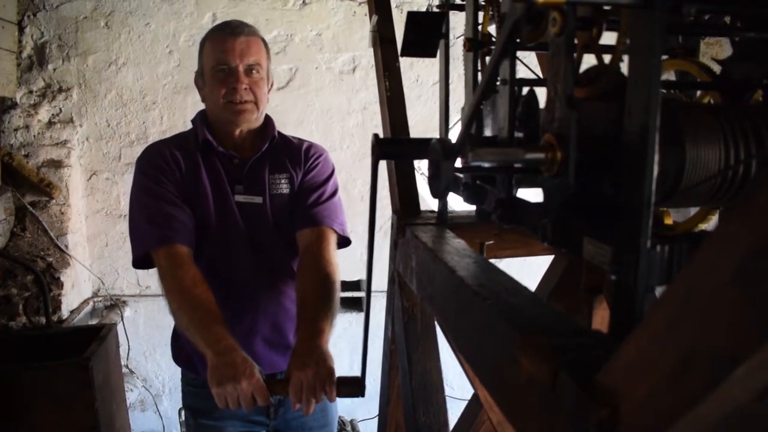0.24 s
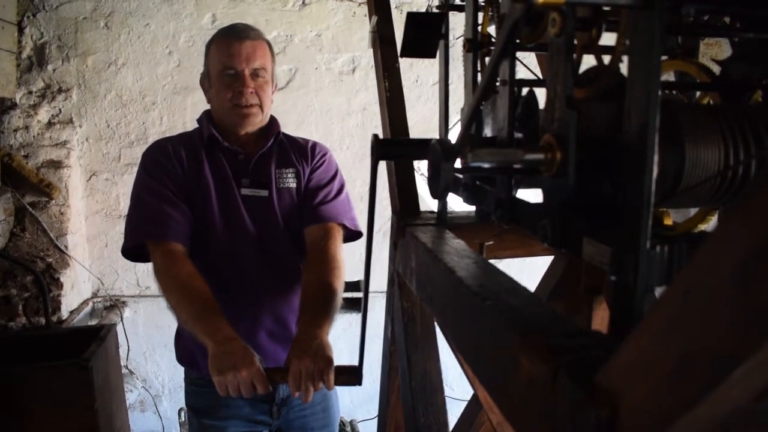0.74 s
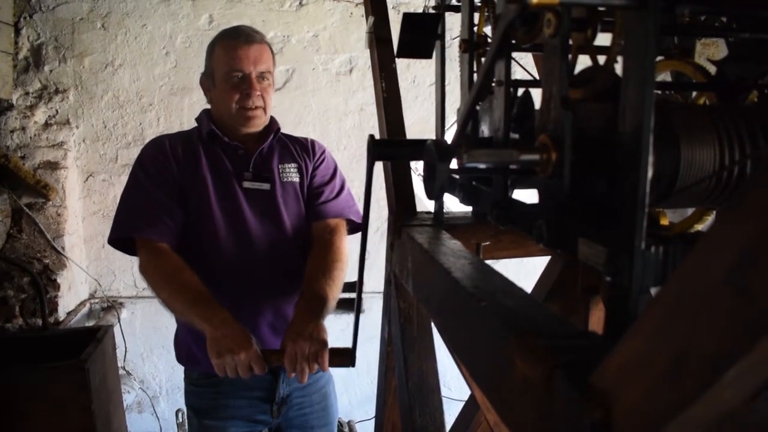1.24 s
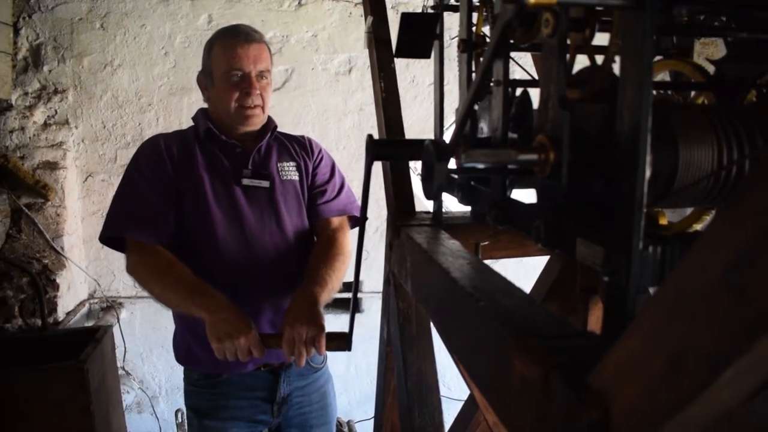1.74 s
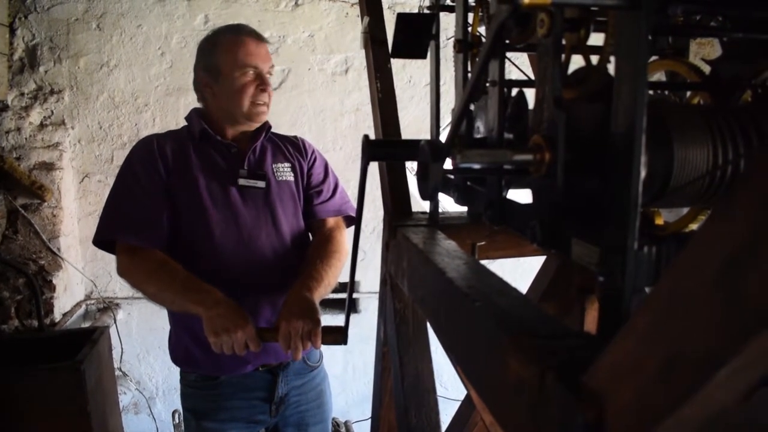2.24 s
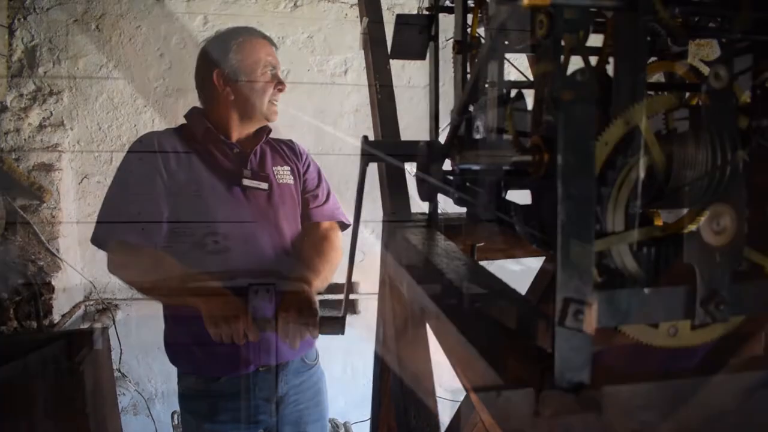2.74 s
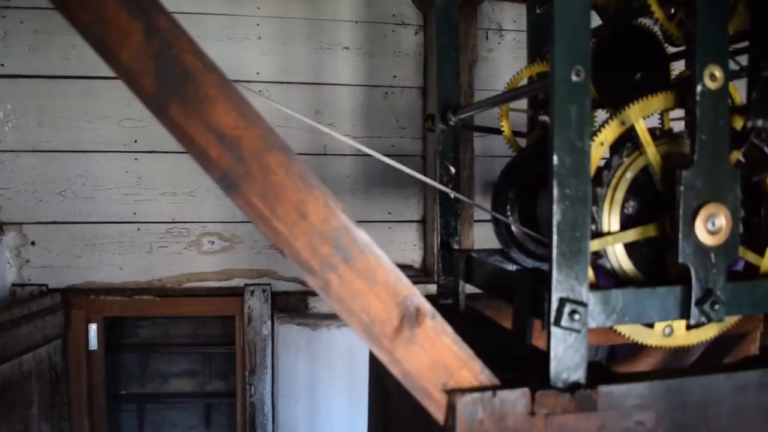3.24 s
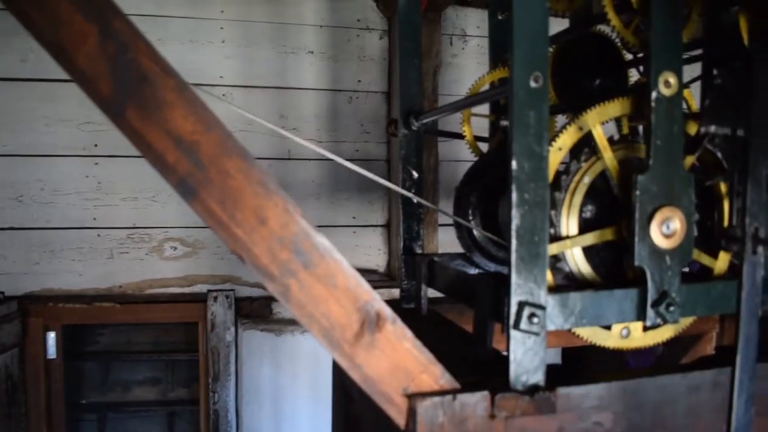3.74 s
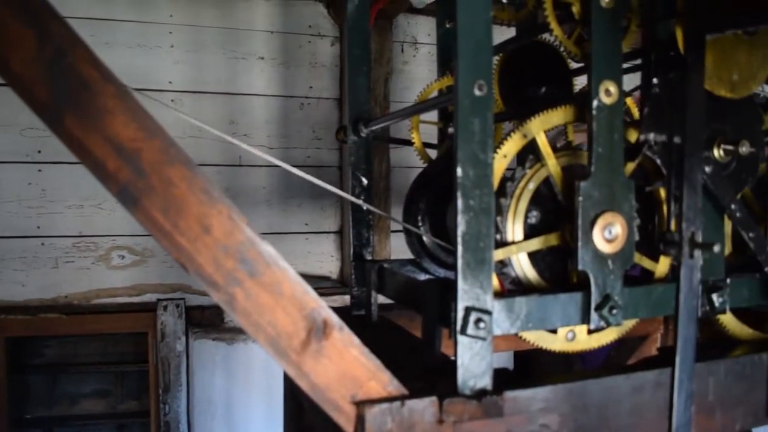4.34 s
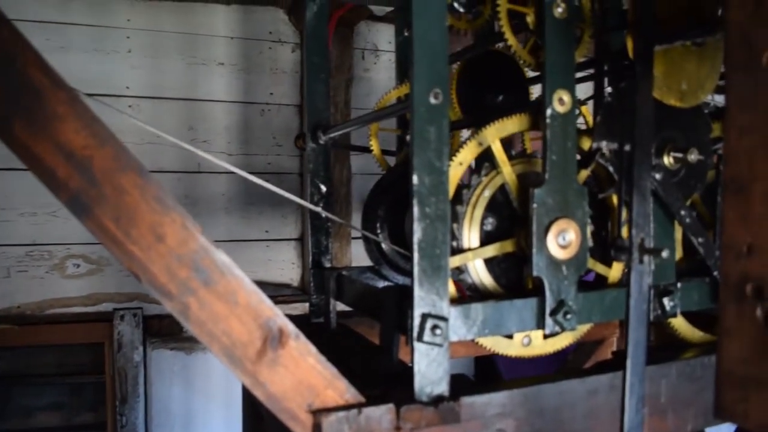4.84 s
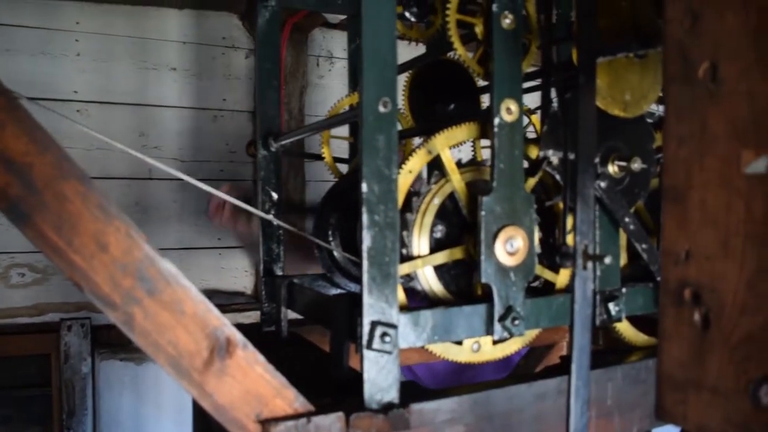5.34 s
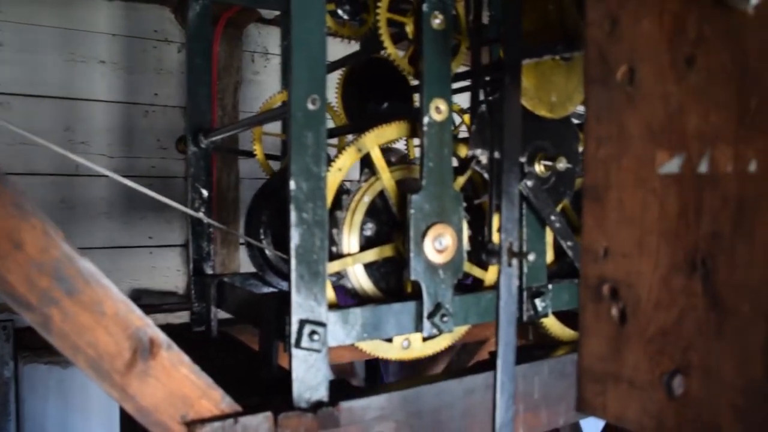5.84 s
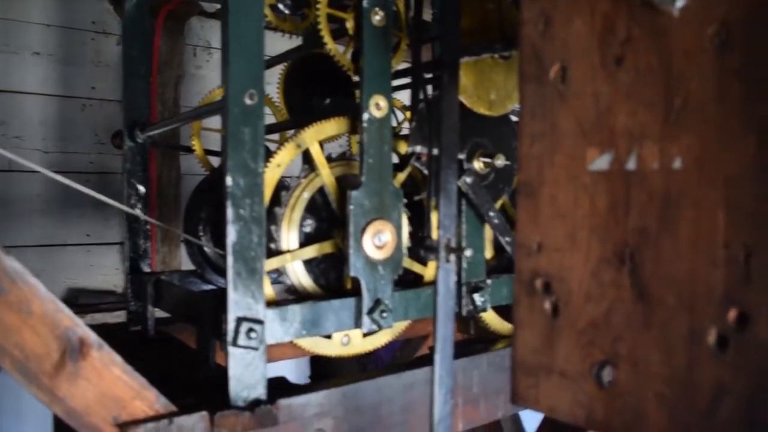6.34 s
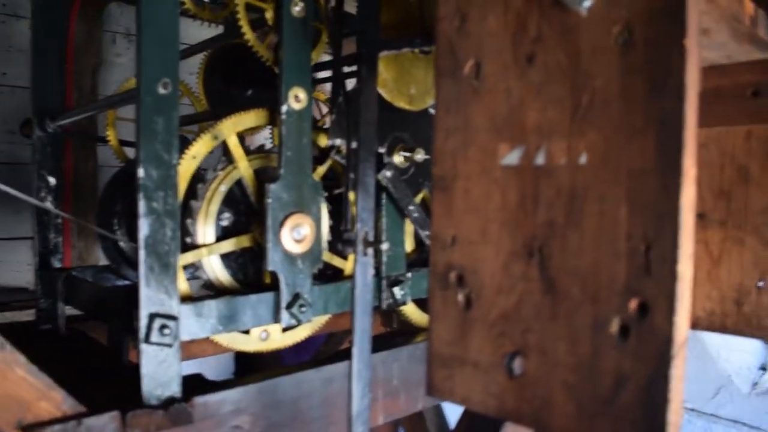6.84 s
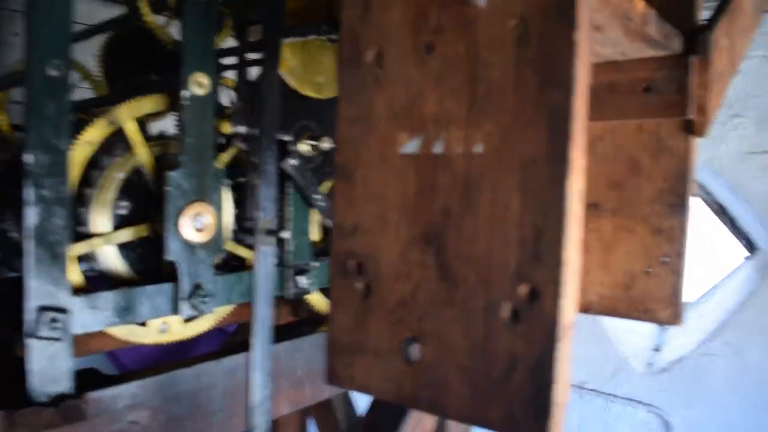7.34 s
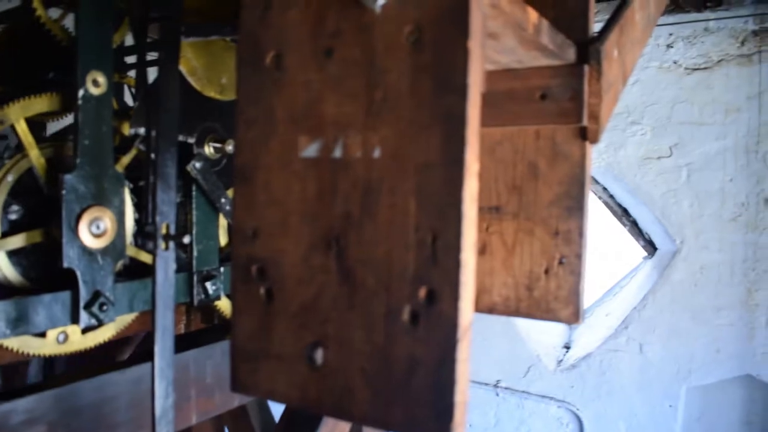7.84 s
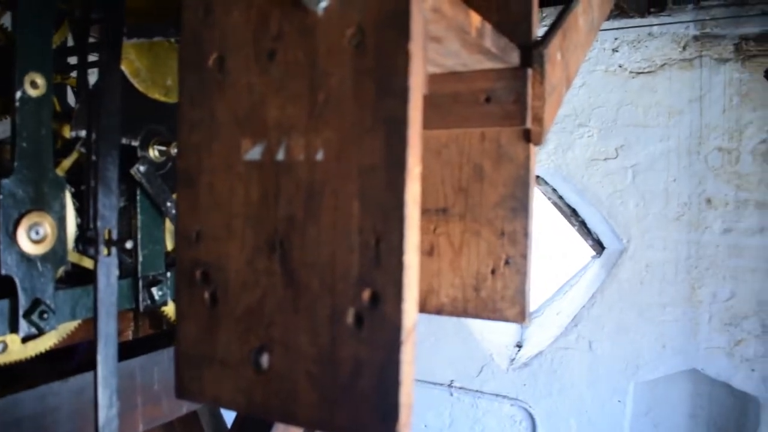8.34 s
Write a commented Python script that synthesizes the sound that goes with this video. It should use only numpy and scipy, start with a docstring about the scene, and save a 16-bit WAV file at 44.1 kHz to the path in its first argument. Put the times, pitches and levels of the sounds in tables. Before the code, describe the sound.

In a small room of stone and boards, a large clock mechanism ticks faintly over a dull hush, with weak rubbing, light snaps and bumps. Two single steel pawl drops clack loudly, the second brighter and heavier. After a brief hush, a rapid ratchet clatter begins and continues, surging and slackening with each crank turn. Close microphone, short dense reflections.

```python
"""A tower clock is wound with a crank in a small room of boards and stone.
Over a dull hush come faint rubbing and ticking, light snaps and bumps, and two single drops of the steel pawl.
Then the hush dips briefly and the pawl clatters tooth after tooth, faster and slower with each turn of the crank.
Filtered noise makes the hush and rubbing; blows are cracks with dense reflections that die band by band;
decaying sines make the thump of the frame at each drop and the hum of the case at each tick."""
import sys
import numpy as np
from scipy import signal
from scipy.fft import rfft, irfft
from scipy.io import wavfile

SR = 44100
rng = np.random.default_rng(int(sys.argv[2]) if len(sys.argv) > 2 else 0)


def store_pcm(level_fs):
    """Save levels as 16-bit WAV."""
    pcm = np.round(np.clip(level_fs, -1, 1) * 32767).astype(np.int16)
    wavfile.write(sys.argv[1], SR, np.atleast_2d(pcm).T)


N = 379260   # samples
RING_S = 0.7   # length of one blow or hum
CUTOFF_HZ = 15900


def from_db(db):
    """Logarithmic level: 20 dB is a tenfold amplitude."""
    return 10 ** (np.asarray(db) / 20)


def at_hz(points, hz, axis=1):
    """Interpolation on a logarithmic frequency axis, of one column of a table."""
    points = np.array(points)
    return np.interp(np.log(hz + 1e-9), np.log(points[:, 0]), points[:, axis])


def colour(spectrum, modes, hz):
    """Resonance: narrow peaks add their power to a broad spectrum."""
    power = 1
    for centre, width, db in modes:
        power = power + from_db(db) ** 2 / (1 + (2 * (hz - centre) / width) ** 2) ** 2
    return from_db(at_hz(spectrum, hz)) * np.sqrt(power)


def coloured_noise(spectrum, modes, level):
    """Filtered noise: white noise takes on a spectrum, then follows a level over time."""
    gain = colour(spectrum, modes, np.fft.rfftfreq(N, 1 / SR))
    noise = irfft(rfft(rng.standard_normal(N)) * gain, N)
    level_db = np.interp(np.arange(N) / SR, *np.transpose(level))
    return noise / noise.std() * from_db(level_db)


def add(track, s, sound):
    """Superposition: a sound is summed into a track at its start time in seconds."""
    at = round(s * SR)
    track[at:at + len(sound)] += sound[:max(N - at, 0)]


# Spectrum of the hush. Each row: frequency in Hz, relative density in dB per Hz.
HUSH_SPECTRUM = [(25, -10.5), (65, 5), (130, -1), (230, 0), (320, -1.5), (440, -4.5), (700, -7.5),
                 (1600, -11.5), (3500, -20), (8000, -27.5), (15000, -38)]
# Loudness of the hush, dipping briefly before the winding. Each row: time in seconds, level in dB.
HUSH_LEVEL = [(0, -64), (2.299, -63), (2.951, -65.5), (3.049, -77.5), (3.13, -85), (3.17, -70),
              (3.35, -54.5), (8.6, -70)]


def air():
    """Broadband noise weighted to the bass: the dull hush of the tower."""
    return coloured_noise(HUSH_SPECTRUM, [], HUSH_LEVEL)


# Spectrum of the rubbing. Each row: frequency in Hz, relative density in dB per Hz.
RUB_SPECTRUM = [(300, -25.5), (1100, -2.5), (3000, -5.5), (5000, -12.5), (12000, -26.5)]
# Resonances of the bearing. Each row: frequency in Hz, width in Hz, height in dB over the rubbing.
BEARING_MODES = [(1340, 170, 14), (1742, 140, 10.5), (2100, 150, 3.5), (2640, 220, 4)]
# Loudness of the rubbing. Each row: time in seconds, level in dB.
RUB_LEVEL = [(0, -62.5), (0.3, -67.5), (0.75, -72.5), (1.0, -80), (2.3, -80), (2.7, -72), (3.05, -93)]


def rubbing():
    """Friction noise through resonances: the slowly turning crank rubs faintly in its bearing."""
    return coloured_noise(RUB_SPECTRUM, BEARING_MODES, RUB_LEVEL)


# How a blow swells and dies in frame and room. Each row: frequency in Hz, swell time constant in seconds,
# hold in seconds and 60 dB decay in seconds, the last two before each source's own scaling.
ROOM_DECAY = [(60, 0.029, 0.083, .55), (170, 0.018, 0.016, 0.6), (345, 0.0049, 0.017, 0.3),
              (707, 0.0036, .016, 0.26), (1470, 0.0004, 0.015, 0.28), (4000, 0.00033, 0.02, 0.24),
              (7000, 0.0012, 0.0061, 0.23), (13780, .0003, 0.016, 0.16)]


def responses(spectrum, modes, crack, hold, decay, count):
    """Reverberation: a crack, then dense reflections that swell, hold and die, heard from several spots."""
    size = round(RING_S * SR)
    t, hz = np.arange(size) / SR, np.arange(size // 2 + 1) * SR / size
    random_phase = np.exp(2j * np.pi * rng.random((count, len(hz))))
    reflections = random_phase * colour(spectrum, modes, hz)
    centres = 62.5 * 2 ** np.arange(0, 8.5, 0.5)   # half-octave bands, in Hz
    out = np.zeros((count, size))
    for centre, pick in zip(centres, np.eye(len(centres))):
        share = np.interp(np.log(hz + 1), np.log(centres), pick)
        swell_s, hold_s, t60 = [at_hz(ROOM_DECAY, centre, axis) for axis in (1, 2, 3)]
        swelling = 1 - np.exp(-t / swell_s)
        dying = np.exp(-np.log(1000) * np.maximum(t - hold * hold_s, 0) / (decay * t60))
        envelope = swelling * dying * (1 + crack * np.exp(-t / 0.0023))
        band = irfft(reflections * share, size)
        # every spot receives the same energy in a band
        even = band.std(axis=1) * np.linalg.norm(envelope) / np.linalg.norm(band * envelope, axis=1)
        out += band * envelope * even[:, None]
    attack = int(0.033 * SR)   # levels refer to the first 33 ms
    return out / out[:, :attack].std()


# Ringing of the small parts of the clockwork. Each row: frequency in Hz, width in Hz, height in dB over the blow.
LEVER_MODES = [(1570, 90, 2.5), (1880, 150, 5), (3386, 300, 5), (4350, 200, 0), (10100, 700, 4.5)]


def small_blows(events, spectrum, crack, hold, decay):
    """Impact: light contacts elsewhere in the works, too weak to set the ratchet ringing."""
    out = np.zeros(N)
    sounds = responses(spectrum, LEVER_MODES, crack, hold, decay, count=4)
    for k, (s, db) in enumerate(events):
        add(out, s, from_db(db) * sounds[k % len(sounds)])
    return out


def timber(modes, swell_s, spread_db):
    """Modal vibration: heavy wood answers slowly, in modes of alternating sign and chance strength."""
    t = np.arange(round(RING_S * SR)) / SR
    hz, db, t60 = np.transpose(modes)[:, :, None]
    sign = (-1) ** np.arange(len(modes))[:, None]
    gain = sign * from_db(db + spread_db * rng.standard_normal(db.shape))
    swell = (1 - np.exp(-t / swell_s)) ** 3
    ringing = np.exp(-np.log(1000) * t / t60) * np.sin(2 * np.pi * hz * t)
    return swell * np.sum(gain * ringing, axis=0)


# Modes of the wooden case. Each row: frequency in Hz, mean strength in dB, 60 dB decay in seconds.
CASE_MODES = [(214.8, -4, 0.51), (237, -6.5, 0.9), (412, -11, 0.1), (514, -12, 0.79)]


def case_hum(events):
    """Forced excitation: each tick sets the wooden case humming."""
    out = np.zeros(N)
    for s, db in events:
        add(out, s, from_db(db) * timber(CASE_MODES, swell_s=0.0077, spread_db=2.5))
    return out


# Faint ticks. Each row: start in seconds, level in dB that drives the hum; the contact itself is 3 dB weaker.
TICK_EVENTS = [(0.055, -51.5), (0.401, -59.5), (0.517, -51), (0.563, -53.5), (0.673, -54.5), (0.716, -57.5),
               (1.18, -53.5), (1.218, -55), (1.353, -52.5), (1.517, -53), (1.556, -56.5), (1.821, -52.5),
               (2.139, -55.5), (2.470, -52.5), (2.589, -52.5), (2.623, -54), (2.746, -56), (2.897, -58.5),
               (3.001, -62)]
# Spectrum of a tick. Each row: frequency in Hz, relative density in dB per Hz.
TICK_SPECTRUM = [(40, 4), (130, 6), (225, 10.5), (330, 7.5), (490, 6.5), (700, -9), (1200, 2), (1800, -4),
                 (3200, -10.5), (5000, -18), (9500, -15.5), (14000, -30.5)]


def ticking():
    """Impact and resonance: the contacts of the clockwork sound together with the hum of its case."""
    contacts = small_blows(TICK_EVENTS, TICK_SPECTRUM, crack=1.6, hold=0.4, decay=0.88)
    return from_db(-3.0) * contacts + case_hum(TICK_EVENTS)


# Light snaps of steel on steel. Each row: start in seconds, level in dB.
SNAP_EVENTS = [(0.399, -63.5), (1.014, -57), (1.074, -53), (1.401, -46.5)]
# Spectrum of a snap. Each row: frequency in Hz, relative density in dB per Hz.
SNAP_SPECTRUM = [(200, -10), (2400, -15), (3200, -6.5), (4600, -5.5), (7000, -5.5), (10000, -3),
                 (13000, -5.5), (15500, -19.5)]


def snapping():
    """Hard impact: steel on steel gives light, bright snaps."""
    return small_blows(SNAP_EVENTS, SNAP_SPECTRUM, crack=0.5, hold=0.42, decay=0.88)


# Dull bumps. Each row: start in seconds, level in dB.
BUMP_EVENTS = [(0.405, -54.5), (1.400, -56), (1.755, -54)]
# Spectrum of a bump. Each row: frequency in Hz, relative density in dB per Hz.
BUMP_SPECTRUM = [(40, -22.5), (120, -7), (250, 5), (400, -8.5), (800, -26.5), (4000, -41.5)]


def bumping():
    """Soft impact: the crank bumps dully in its bearing."""
    return small_blows(BUMP_EVENTS, BUMP_SPECTRUM, crack=0.2, hold=0.9, decay=0.85)


def brighten(sound, tilt_db):
    """Spectral tilt: so many dB per octave about 3 kHz, level below 500 Hz."""
    hz = np.maximum(np.fft.rfftfreq(len(sound), 1 / SR), 500)
    return irfft(rfft(sound) * from_db(tilt_db * np.log2(hz / 3000)), len(sound))


SPARKLE_HZ = 11100   # half of the dB change is reached here


def sparkle(sound, db):
    """Contact stiffness: a sharper or blunter contact raises or lowers the highest ringing."""
    hz = np.fft.rfftfreq(len(sound), 1 / SR)
    share = 1 / (1 + (SPARKLE_HZ / (hz + 1)) ** 10)
    return irfft(rfft(sound) * from_db(db * share), len(sound))


# Ringing of pawl and wheel, also in the winding. Each row: frequency in Hz, width in Hz,
# height in dB over the clack before brightening.
STEEL_MODES = [(965, 22, 7.5), (1321, 31, 8.5), (1493, 70, 6.5), (1765, 26, 7.5), (2090, 28, 10),
               (2446, 60, 7.5), (2607, 40, 7.5), (3158, 60, 6), (3612, 120, 9), (3866, 90, 10),
               (3994, 110, 19), (4057, 82, 21.5), (4210, 85, 10), (5480, 44, 3), (6210, 60, 9.5),
               (6917, 120, 15.5), (7080, 280, 12), (12980, 330, 14)]
# Modes of the timber frame, thumped by every drop. Each row: frequency in Hz, mean strength in dB
# before the thump's own level, 60 dB decay in seconds.
FRAME_MODES = [(69.5, -18.5, .35), (105.7, -15.5, 0.39), (163.8, 3, 0.14), (188.2, 3, 0.12),
               (241.9, -10, .2), (297.5, -6.5, 0.12), (346, -12, .17)]
# Spectrum of a single drop before brightening. Each row: frequency in Hz, relative density in dB per Hz.
DROP_SPECTRUM = [(30, -29.5), (80, -2.5), (250, -0.5), (420, -4.5), (800, -3.5), (1700, -4.5), (2700, -6.5),
                 (4700, -9.5), (6000, -10), (9500, -3.5), (12000, -13), (15500, -26.5)]
# Single pawl drops. Each row: start in seconds, level in dB, brightness in dB per octave,
# thump in dB relative to that level, change of the highest ringing in dB.
DROP_EVENTS = [(0.8934, -19, -0.73, -15.5, -5.5), (1.9512, -19, 0, -2, 2)]


def single_drops():
    """Impact: the pawl falls from a tooth tip, close by; a cleaner fall is brighter and thumps harder."""
    out = np.zeros(N)
    sounds = responses(DROP_SPECTRUM, STEEL_MODES, crack=0.4, hold=0.7, decay=0.95, count=len(DROP_EVENTS))
    for (s, db, tilt_db, thump_db, top_db), sound in zip(DROP_EVENTS, sounds):
        clack = sparkle(brighten(sound, tilt_db), top_db)
        thump = from_db(thump_db) * timber(FRAME_MODES, swell_s=0.02, spread_db=8.5)
        add(out, s, from_db(db) * (clack + thump))
    return out


# Progress of the crank, which slows at the hard parts of each turn and gathers pace overall.
# Each row: time in seconds, tooth number.
CRANK_PROGRESS = [(3.1709, 1), (3.3021, 2), (3.4205, 3), (3.7012, 6), (3.8689, 8), (3.9755, 9),
                  (4.2255, 12), (4.4381, 15), (4.611, 17), (4.7134, 18), (4.9485, 20), (5.0946, 22),
                  (5.2878, 25), (5.462, 28), (5.668, 32), (6.1934, 40), (6.367, 42), (6.5254, 44),
                  (6.8554, 49), (7.0851, 52), (7.2035, 54), (7.6968, 64), (7.887, 67), (8.4126, 76),
                  (8.565, 78)]
# Force of the drops, building up as the crank takes the load. Each row: time in seconds,
# level in dB before the changes with speed and from tooth to tooth.
DROP_FORCE = [(3.171, -38.5), (3.302, -31.6), (3.45, -29.5), (8.565, -27.5)]
USUAL_TEETH_PER_S = 15
SPEED_DB = 0.87   # louder per doubling of the crank's speed
UNEVEN_DB = 0.42   # spread from tooth to tooth


def teeth():
    """Ratchet kinematics: one drop per tooth of crank travel, a little harder at speed."""
    crank_s, tooth = np.transpose(CRANK_PROGRESS)
    numbers = np.arange(round(tooth[0]), round(tooth[-1]) + 1)
    s = np.interp(numbers, tooth, crank_s)
    teeth_per_s = 1 / np.gradient(s)
    speed_db = SPEED_DB * np.log2(teeth_per_s / USUAL_TEETH_PER_S)
    uneven_db = UNEVEN_DB * rng.standard_normal(len(s))
    db = np.interp(s, *np.transpose(DROP_FORCE)) + speed_db + uneven_db
    return np.transpose([s, db])


# Spectrum of a winding clack before brightening. Each row: frequency in Hz, relative density in dB per Hz.
WINDING_SPECTRUM = [(30, -36), (70, -5.5), (130, -1.5), (200, -0.5), (290, -2.5), (400, -7), (900, -4),
                    (1900, -3), (3000, -4), (5000, -5), (6200, -6), (8000, -3), (10000, -6.5), (12000, -14),
                    (15500, -24)]
SPARKLE_DB = 2.5   # spread of the highest ringing from tooth to tooth
THUMP_DB, THUMP_FADE_DB_PER_S = 0.86, 0.6   # the frame's thump weakens as the listener walks on
FIRST_TILT_DB, LAST_TILT_DB = -1.47, 0.58   # brightness per octave at the first and last spot
LINGER_S, UNLIKE = 0.52, 0.22   # width of the blend between spots; chance share of every spot


def winding():
    """Repeated impact: nearly equal clacks, whose reflections change slowly as the listener walks past."""
    out = np.zeros(N)
    sounds = responses(WINDING_SPECTRUM, STEEL_MODES, crack=0.34, hold=0.99, decay=0.94, count=9)
    tilts_db = np.linspace(FIRST_TILT_DB, LAST_TILT_DB, len(sounds))
    sounds = np.array([brighten(sound, tilt_db) for sound, tilt_db in zip(sounds, tilts_db)])
    drops = teeth()
    spots_s = np.linspace(drops[0, 0], drops[-1, 0], len(sounds))
    for s, db in drops:
        nearness = np.exp(-((s - spots_s) / LINGER_S) ** 2)
        chance = UNLIKE * rng.standard_normal(len(sounds))
        clack = sparkle((nearness + chance) @ sounds, SPARKLE_DB * rng.standard_normal())
        clack *= sounds.std() / clack.std()
        thump_db = THUMP_DB - THUMP_FADE_DB_PER_S * (s - spots_s[0])
        thump = from_db(thump_db) * timber(FRAME_MODES, swell_s=0.015, spread_db=3.0)
        add(out, s, from_db(db) * (clack + thump))
    return out


def scene():
    """Superposition: room, clockwork and ratchet sum in one channel."""
    background = air() + rubbing()
    clockwork = ticking() + snapping() + bumping()
    ratchet = single_drops() + winding()
    return (background + clockwork + ratchet)[None]


def record(dry):
    """Low-pass filtering: an elliptic filter cuts the top steeply."""
    low_pass = signal.ellip(10, 0.2, 70, CUTOFF_HZ, fs=SR, output="sos")   # 0.2 dB ripple, 70 dB stop
    return signal.sosfilt(low_pass, dry)


dry = scene()
out = record(dry)
store_pcm(out)
```